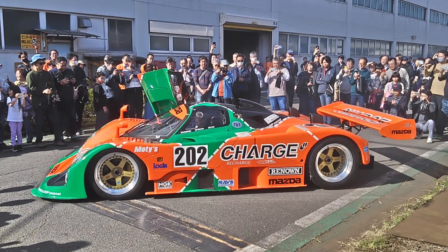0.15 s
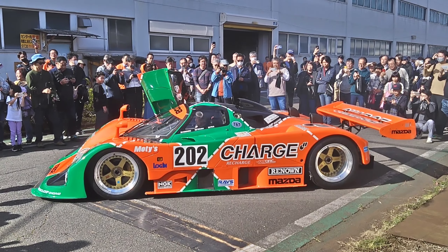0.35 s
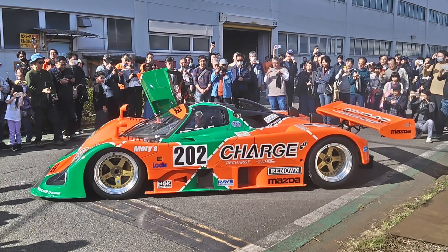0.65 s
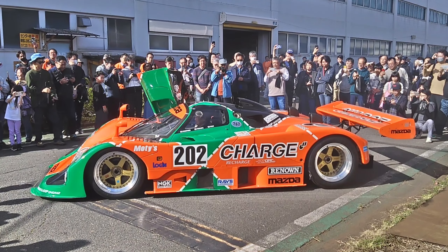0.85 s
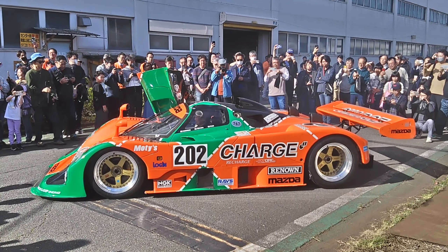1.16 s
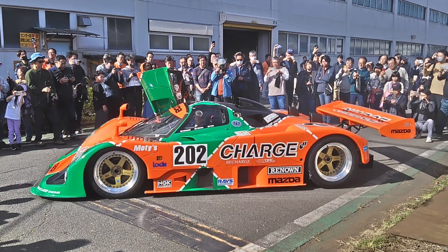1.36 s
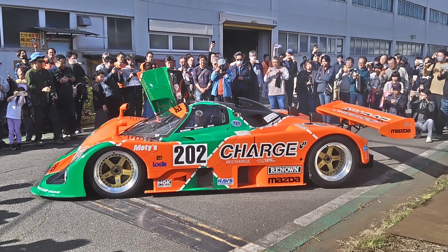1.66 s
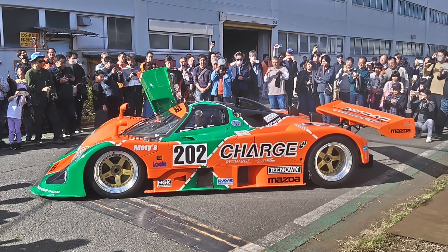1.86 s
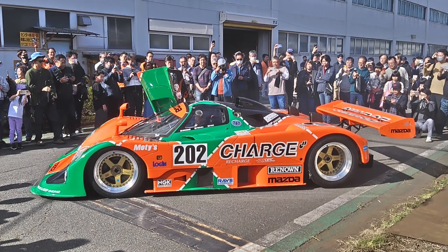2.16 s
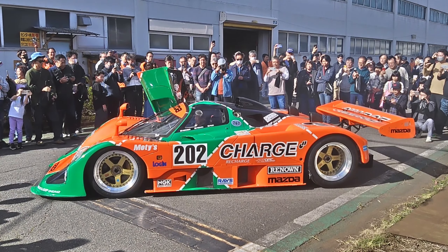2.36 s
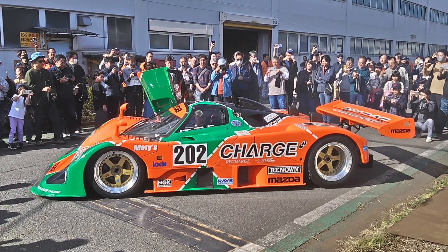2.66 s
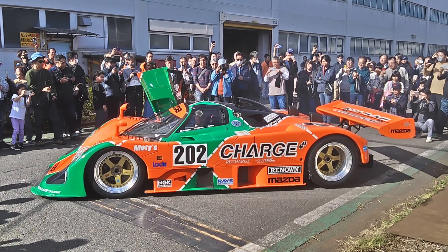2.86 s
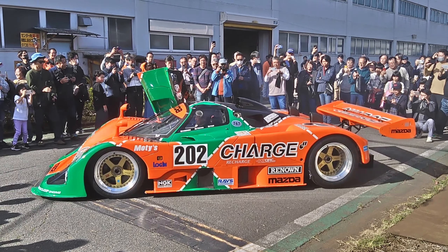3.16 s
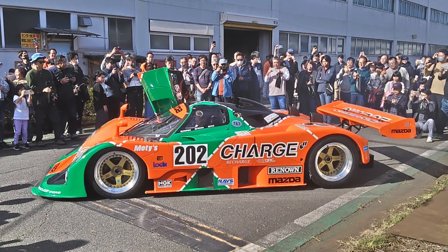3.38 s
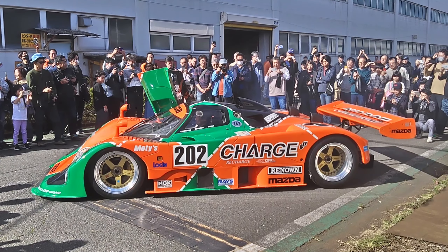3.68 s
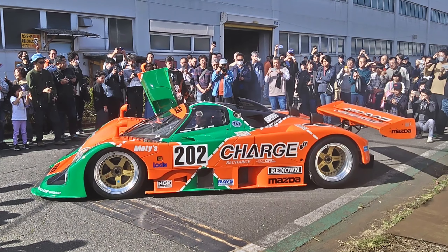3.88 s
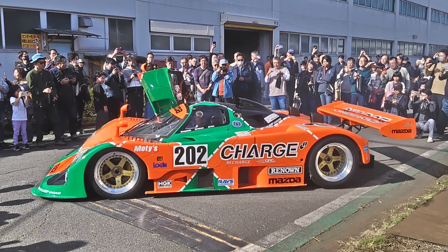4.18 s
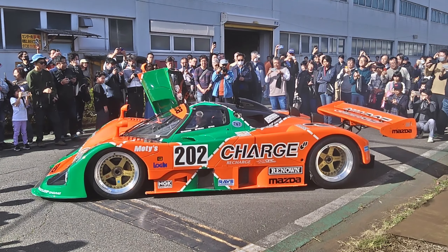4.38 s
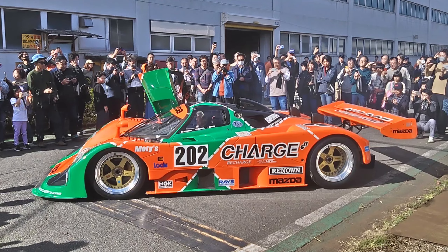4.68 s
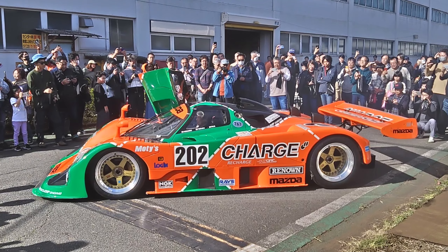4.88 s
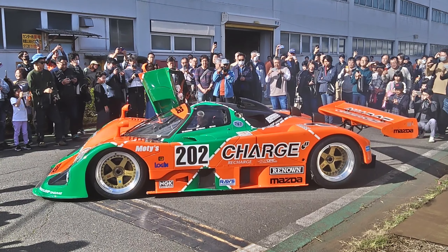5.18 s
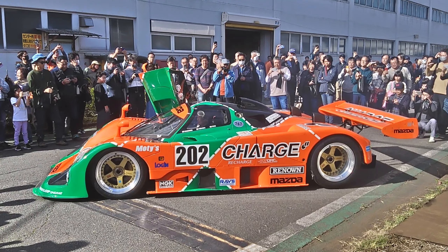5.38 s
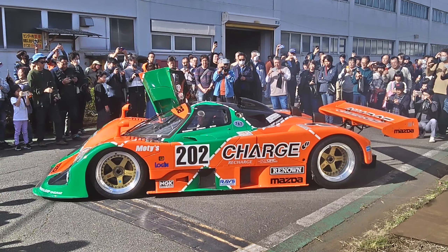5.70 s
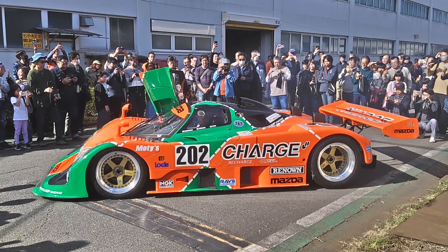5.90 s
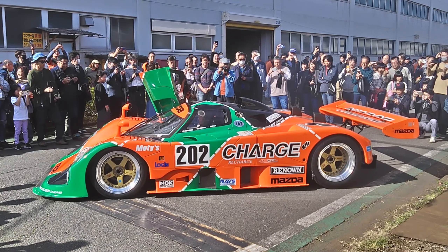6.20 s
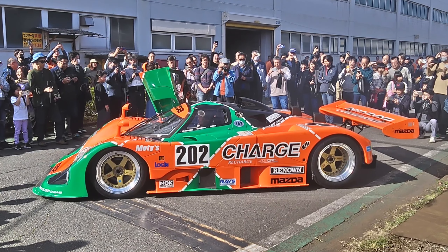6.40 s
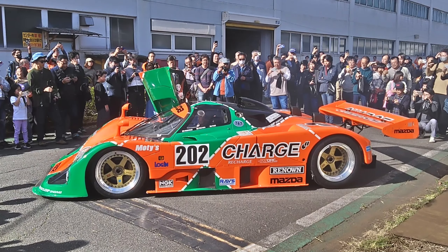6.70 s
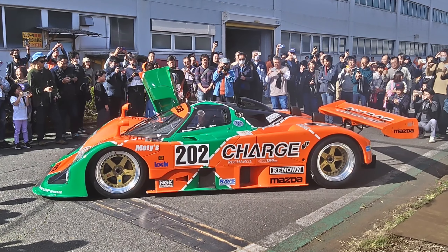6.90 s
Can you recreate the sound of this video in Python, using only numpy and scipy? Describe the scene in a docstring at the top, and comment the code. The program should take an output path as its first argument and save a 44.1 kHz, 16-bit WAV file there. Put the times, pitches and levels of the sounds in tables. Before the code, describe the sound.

Close to a stationary race car outdoors, a stereo microphone picks up its loud rotary engine revving in an even series of eight blips. Each time the engine gulps, often stumbles, then shoots up to a howling, metallic rasp, thuds and winds down toward a rough idle. The exhaust booms and gas hisses, while the gliding note beats against its echo from a nearby wall.

```python
"""A yard before a building, stereo microphone by a standing car: its four-rotor racing engine is blipped.
Eight revs, each a fast rasping climb, a thud as the throttle shuts, then a long falling note;
between them a lumpy idle, a gulp of mixture and often a misfire.
The firings ring the exhaust at its pipe resonances, and gas hisses through the ports.
The facade throws the sound back, so the gliding note beats with its echo."""
import sys
import numpy as np
from scipy import signal
from scipy.fft import rfft, irfft, next_fast_len
from scipy.io import wavfile
from scipy.ndimage import uniform_filter1d, map_coordinates

SR = 44100
rng = np.random.default_rng(int(sys.argv[2]) if len(sys.argv) > 2 else 0)


def master_out(mix):
    """Clip the mix to full scale and print it as 16-bit PCM to the path in sys.argv[1]."""
    frames = np.transpose(np.atleast_2d(mix))
    ceiling = np.clip(frames, -1, 1)
    pcm = np.round(ceiling * 32767).astype(np.int16)
    wavfile.write(sys.argv[1], SR, pcm)


N = 310905

# throttle blips, the first and last cut by the ends of the scene: pedal down t/s, engine catches t/s,
# pedal lifts t/s, run-down settles t/s, surge length/s, top firing rate f/Hz, stumble below idle f/Hz,
# relative rev level/dB
BLIPS = [(-.2, .04, 0.12, .237, 0.075, 361.6, -8, -1), (.662, .912, 1.01, 1.135, 0.089, 351.7, 4, -1),
         (1.582, 1.738, 1.865, 2.075, 0.061, 436.2, 3.5, -1),
         (2.449, 2.69, 2.758, 2.96, 0.059, 412.3, -0.5, 0.9),
         (3.372, 3.576, 3.655, 3.865, 0.053, 412.7, 2, 1.5),
         (4.277, 4.44, 4.57, 4.768, 0.056, 441.7, 0, 0.06),
         (5.155, 5.394, 5.468, 5.595, .064, 355, 32, 0.5), (6.011, 6.287, 6.347, 6.5, 0.064, 378.8, 23, 1),
         (6.912, 7.16, 7.4, 7.8, 0.069, 399.3, 4, -3)]
IDLE_HZ = 120.85  # firing rate


def amp(db):
    """Decibels to gain."""
    return 10 ** (np.asarray(db) / 20)


def unit(x):
    """Scale to rms 1."""
    return x / np.sqrt(np.mean(x ** 2) + 1e-20)


def even(x, size=3500):
    """Scale to a running rms of 1, keeping fast beats and pulses."""
    power = np.mean(np.atleast_2d(x) ** 2, axis=0)
    smoothed = uniform_filter1d(uniform_filter1d(power, size), size // 2)
    return x / np.sqrt(np.abs(smoothed) + 1e-12)


def along(points, hz):
    """Interpolate (f/Hz, value) points on a log axis."""
    f, values = np.transpose(points)
    return np.interp(np.log(hz + 1), np.log(f + 1), values)


def wobble(knots_per_s):
    """A smooth random curve."""
    steps = np.arange(0, N, 32)
    curve = map_coordinates(rng.standard_normal(N // 20), [steps * knots_per_s / SR], mode="wrap")
    return np.interp(np.arange(N), steps, curve)


def filtered(x, response):
    """x times a complex response of frequency."""
    size = next_fast_len(N + SR // 2)
    return irfft(rfft(x, size) * response(np.fft.rfftfreq(size, 1 / SR)), size)[..., :N]


def coloured(x, colour):
    """x through a curve of (f/Hz, level/dB) points."""
    return filtered(x, lambda hz: amp(along(colour, hz)))


def burst(start, end, attack_s, release_s):
    """Round-shouldered power envelope; its skirts rise 20 dB per attack_s and fall 20 dB per release_s."""
    t = np.arange(0, N, 64) / SR
    skirt = lambda away: amp(20 * np.clip(away, -10, 10)) ** 2
    power = 1 / (1 + skirt((start - t) / attack_s) + skirt((t - end) / release_s))
    return np.interp(np.arange(N) / SR, t, power)


def pulse(centre_s, length_s, attack_s, release_s):
    """A burst given by its centre and length."""
    return burst(centre_s - length_s / 2, centre_s + length_s / 2, attack_s, release_s)


def spread(pair):
    """Two unrelated signals across the microphone pair: alike in the bass, apart in the treble."""
    likeness = [(60, .92), (130, .89), (330, .89), (560, .65), (950, 0), (2000, .65), (4000, .15)]  # f/Hz, left-right correlation
    turn = lambda hz: np.arccos(np.clip(along(likeness, hz), -1, 1)) / 2
    mid, side = filtered(pair, lambda hz: np.array([np.cos(turn(hz)), np.sin(turn(hz))]))
    return np.array([mid + side, mid - side])


def firing_rate():
    """Firings per second: bog, idle, perhaps a stumble, a steep climb, a moment at the top, run-down."""
    creep_hz, catch_hz, settle_hz = 151.53, 239.17, 291.75
    spin_down_hz_per_s, drag_hz_per_s = 780, 436  # the shaft slows fast from the top, then steadily
    bog_hz, bog_s, recover_s = 15, .05, .07  # it bogs as the pedal goes down, then settles to idle
    knots = []
    settled = BLIPS[0][0] - (settle_hz - IDLE_HZ) / drag_hz_per_s
    for pedal, catch, lift, settle, surge_s, top_hz, stumble_hz, _ in BLIPS:
        run_down = lambda s: settle_hz - drag_hz_per_s * (s - settled)
        idling, surging = pedal + recover_s, catch - surge_s
        top = lift + .007  # the climb overshoots the lift
        falling = max(top, settle - (top_hz - settle_hz) / spin_down_hz_per_s)
        knots += [(pedal - bog_s, run_down(pedal - bog_s)), (pedal, run_down(pedal) - bog_hz),
                  (idling, IDLE_HZ), ((idling + surging) / 2, IDLE_HZ - stumble_hz), (surging, IDLE_HZ),
                  (surging + .52 * surge_s, creep_hz), (catch, catch_hz),
                  (top, top_hz), (falling, top_hz), (settle, settle_hz)]
        settled = settle
    times, rates = np.transpose(sorted(knots))
    return np.interp(np.arange(N) / SR, times, rates)


def inrush(level_db, delay_s, hold_s, attack_s, release_s):
    """Power of the gas rushing in after each press of the pedal."""
    starts = [pedal + delay_s for pedal, *_ in BLIPS]
    return amp(level_db) ** 2 * sum(burst(s, s + hold_s, attack_s, release_s) for s in starts)


def rev(level_db, lag_s, attack_s, release_s):
    """Power of full combustion, from the surge until the pedal lifts."""
    return sum(amp(level_db + db) ** 2 * burst(catch - surge_s + lag_s, lift, attack_s, release_s)
               for _, catch, lift, _, surge_s, *_, db in BLIPS)


def thud(level_db, delay_s, attack_s, release_s):
    """Power of the thud as the throttle shuts."""
    shuts = [lift + delay_s for _, _, lift, *_ in BLIPS]
    return amp(level_db) ** 2 * sum(burst(s, s, attack_s, release_s) for s in shuts)


def coasting(rate, idle_db, octave_db):
    """Power with the throttle shut, growing with each doubling of the speed."""
    return amp(idle_db + octave_db * np.log2(rate / IDLE_HZ)) ** 2


def levels(rate):
    """Boom, howl, rasp, hiss and chuff in dB: coasting, inrush, gulp, rev and thud, less the misfires."""
    # the pipes swell where the note passes their resonances: firing rate f/Hz, level/dB
    boom_driven = [(120, -12.5), (152, -14), (185, -13.5), (228, -6.5), (265, -14), (310, -12),
                   (365, -12.5), (450, -18)]
    boom_coasting = [(95, -26.5), (116, -20.5), (145, -27.5), (160, -28), (176, -22.5), (194, -20.5),
                     (208, -25), (265, -32.5), (350, -29)]
    howl_coasting = [(120, -49), (195, -32.5), (235, -34), (258, -25.5), (281, -29.5), (300, -42)]
    gulps = [(0.744, 0.031, -9.5, -27), (1.664, 0.031, -10, -24), (2.531, 0.07, -10, -27),
             (3.474, 0.082, -9.5, -25.5), (4.368, 0.033, -10, -22.5), (5.219, 0.03, -9, -23),
             (6.082, .045, -15, -29.5), (7.021, 0.058, -10.5, -25.5)]  # first gulps of mixture: centre t/s, length/s, boom level/dB, bark level/dB
    misfires = [(.8, 0.038, 8.5), (1.706, 0.027, 5), (2.617, .02, 4.5), (4.405, .02, 7.5),
                (5.291, 0.04, 7.5), (6.137, 0.047, 4)]  # between gulp and rev: centre t/s, length/s, dip/dB before dip_share
    dip_share = [.61, 0, .47, .25, 0]  # one a layer
    gulp = sum(amp(db) ** 2 * pulse(s, length, .063, .085) for s, length, db, _ in gulps)
    bark = sum(amp(db) ** 2 * pulse(s, length, .065, .13) for s, length, _, db in gulps)
    dip_db = sum(db * pulse(s, length, .02, .019) for s, length, db in misfires)
    boom = (amp(along(boom_coasting, rate)) ** 2 + gulp
            + rev(along(boom_driven, rate), lag_s=-.011, attack_s=.062, release_s=.094))
    howl = (amp(along(howl_coasting, rate)) ** 2 + bark
            + inrush(-41.5, delay_s=.011, hold_s=.075, attack_s=.084, release_s=.13)
            + rev(-13, lag_s=.027, attack_s=.047, release_s=.092))
    rasp = (coasting(rate, idle_db=-53.5, octave_db=7.5) + amp(-20.5) ** 2 * bark
            + rev(-19.5, lag_s=.03, attack_s=.052, release_s=.081))
    hiss = (coasting(rate, idle_db=-58.5, octave_db=6.5) + amp(-25) ** 2 * bark
            + inrush(-43, delay_s=.024, hold_s=.1, attack_s=.025, release_s=.11)
            + rev(-32.5, lag_s=.049, attack_s=.12, release_s=.165))
    chuff = (coasting(rate, idle_db=-52.5, octave_db=2.5)
             + inrush(-23, delay_s=.0073, hold_s=.1, attack_s=.027, release_s=.19)
             + rev(-46, lag_s=.01, attack_s=.14, release_s=.22)
             + thud(-23.5, delay_s=.016, attack_s=.04, release_s=.072))
    return 10 * np.log10([boom, howl, rasp, hiss, chuff]) - np.outer(dip_share, dip_db)


def engine_note(firings, rate, load, overrun, lumpy):
    """The pressure wave of the firings: each order shakes on its own, and breaks up on the overrun."""
    orders = [(.5, -12), (1, 3), (1.5, -23.5), (2, -4), (3, -11.5), (4, -18), (5, -17)]  # multiple of the firing rate (halves from unequal rotors), level/dB
    swell = [(100, -9), (115, 9), (135, 1), (185, 4), (255, -3), (300, -6), (335, -6), (385, -0.5),
             (440, -13), (505, -3), (570, -4), (660, -4), (720, -12), (780, -3), (860, -6)]  # peaks and notches from ground and wall reflections that each order glides through: f/Hz, level/dB
    shake = .12 + .1 * lumpy + .08 * overrun + .3 * load
    limp = 3 * overrun - load  # weights the half orders
    wave = 0
    for order, db in orders:
        swell_db = overrun * (along(swell, order * rate) + 3.2 * wobble(28))
        soft_db = -5 * lumpy * (order > 1)  # soft overtones near idle
        size = amp(db + swell_db + soft_db) * (1 + shake * wobble(130)) * (1 + limp * (order % 1))
        wave += size * np.sin(2 * np.pi * order * firings)
    return wave


def puffs(firings, sharpness, scatter_db, between):
    """A burst of turbulent gas each time an exhaust port opens, no two of the same size."""
    size = amp(scatter_db * rng.standard_normal(N // 50))[firings.astype(int)]
    gate = between + unit(size * np.exp(-sharpness * (firings % 1)))
    return unit(spread(gate * rng.standard_normal((2, N))))


def ringing(x, modes, colour, leak):
    """x through a pipe: resonances on top of what leaks straight through, under a broad colour."""
    def response(hz):
        peaks = sum(amp(db) * 1j * hz * width / (centre ** 2 - hz ** 2 + 1j * hz * width)
                    for centre, width, db in modes)
        return (leak + peaks) * amp(along(colour, hz))
    return filtered(x, response)


def exhaust(firings, rate, load, boom_db, howl_db):
    """The note and the turbulence of combustion make the long pipe boom and the tailpipe howl."""
    # pipe resonances: f/Hz, width/Hz, level/dB
    long_pipe = [(118.9, 8, 1.5), (184.7, 18.4, 2.5), (227.7, 33.5, 4), (301, 49, -1.5), (355, 14, -12.5),
                 (405, 59, -5)]
    tailpipe = [(514, 33, -2.5), (569.6, 28.4, 2.5), (655, 100, -4), (708, 28, 3.5), (769, 34, 0),
                (834, 29, -20)]
    # broad colour of each pipe: f/Hz, level/dB
    boom_colour = [(30, -13), (80, 2.5), (130, 1.5), (400, -2), (480, -39), (700, -82)]
    howl_colour = [(250, -28), (400, -1), (490, 1), (820, 0), (930, -11.5), (1400, -6), (3000, -78)]
    fall_hz_per_s = uniform_filter1d(-np.gradient(rate) * SR, size=1500)
    overrun = np.clip(fall_hz_per_s / 300, 0, 1)
    starved = overrun * np.clip((rate - 285) / 30, 0, 1)  # shut at high revs, the engine hardly fires
    slow = np.clip((210 - rate) / 60, 0, 1)
    lumpy = (1 - overrun) * slow  # it labours as it picks up from idle
    weak_rotor = .5 * (slow - lumpy / 2) + .25 * load
    chug = 1 + weak_rotor * np.sin(np.pi * firings / 2)  # a lump each shaft turn
    wave = amp(-14 * starved) * engine_note(firings, rate, load, overrun, lumpy)
    gas = puffs(firings, sharpness=2.9, scatter_db=1.5, between=1)
    boom_gas = amp(5 + 6 * load + 4 * overrun + 4 * lumpy) * gas
    howl_gas = amp(-3 + 5 * load + 4.5 * lumpy) * gas
    boom = chug * even(ringing(wave + boom_gas, long_pipe, boom_colour, leak=.34))
    howl = chug * even(ringing(wave + howl_gas, tailpipe, howl_colour, leak=.51))
    sputter_db = .8 + 1.6 * overrun + .4 * lumpy
    return (yard(amp(boom_db + sputter_db * wobble(42) - .39) * boom, wet_db=-10.5)
            + yard(amp(howl_db + sputter_db * wobble(42) - 2.07) * howl, wet_db=-12))


def yard(x, wet_db):
    """At the microphone: direct sound, wall echoes (the facade's travels 16 m more), a diffuse tail."""
    decay = [(100, 0.34), (600, 1), (3000, 1), (12000, 0.34)]  # reverberation: f/Hz, t60/s
    walls = [(0.019, -39.5), (.046, -9)]  # echoes: delay t/s, level/dB
    hz, t, noise = signal.stft(rng.standard_normal((2, SR // 2)), SR, nperseg=256)
    tail = signal.istft(noise * amp(-60 * t / along(decay, hz)[:, None]), SR, nperseg=256)[1]
    tail /= np.linalg.norm(tail[0])
    diffuse = signal.fftconvolve(x.mean(axis=0)[None], tail, axes=1)[:, :N]
    echoed = filtered(x, lambda f: 1 + sum(amp(db) * np.exp(-2j * np.pi * f * s) for s, db in walls))
    return echoed + amp(wet_db) * spread(diffuse)


def bodywork(x, t60, count=4):
    """Many close reflections ripple the treble, differently left and right; the ripple drifts."""
    t = np.arange(SR // 20) / SR
    scatter = rng.standard_normal((count, 2, len(t))) * amp(-60 * t / t60)
    scatter /= np.linalg.norm(scatter, axis=2, keepdims=True)
    drift = np.array([wobble(7) for _ in scatter])
    drift /= np.linalg.norm(drift, axis=0)
    return .7 * x + sum(share * signal.oaconvolve(x, paths, axes=1)[:, :N]
                        for share, paths in zip(drift, scatter))


def outlet_rasp(firings, rate, load, level_db):
    """Steep pressure fronts of uneven size and torn gas ring the metal outlet, higher as the gas heats."""
    outlet = [(1068, 73, 7), (1205, 65, 5), (1385, 42, 6.5), (1640, 66, 3), (1831, 79, 4.5),
              (2057, 54, 4.9), (2374, 35, 8)]  # resonances of the thin metal outlet: f/Hz, width/Hz, level/dB
    colour = [(500, -59), (850, 13), (1050, 5.5), (2150, 3.5), (2450, -5.5), (2900, -3), (4500, -2),
              (8000, -15)]  # f/Hz, level/dB
    hot_stretch = 1.048
    fronts = np.diff(np.floor(firings), prepend=0) * amp(4 * rng.standard_normal(N))
    drive = 1.1 * load * unit(bodywork(fronts[None], t60=.008))
    drive += puffs(firings, sharpness=3, scatter_db=3, between=.55)
    heat = np.clip((rate - 200) / 200, 0, 1)
    cool = ringing(drive, outlet, colour, leak=.2)
    hot = ringing(drive, [(hz * hot_stretch, width, db) for hz, width, db in outlet], colour, leak=.24)
    return amp(level_db) * even((1 - heat) * cool + heat * hot)


def bite(firings):
    """A short, coarse crackle near 2.6 kHz as each rev climbs, one crack a firing."""
    bites = [(0.025, .08, -33), (0.96, 0.023, -30.5), (1.78, 0.076, -49), (2.71, .08, -34),
             (3.595, 0.037, -29), (4.47, 0.059, -42), (5.4, 0.066, -36), (6.293, 0.061, -33.5)]  # one crackle a rev: centre t/s, length/s, level/dB
    colour = [(1000, -20), (2000, 5), (2600, 7.5), (3100, -4), (4500, -13), (6000, -13), (10000, -31)]  # f/Hz, level/dB
    cracks = bodywork(puffs(firings, sharpness=12, scatter_db=5, between=.06), t60=.006)
    power = sum(amp(db) ** 2 * pulse(s, length, .013, .12) for s, length, db in bites)
    return np.sqrt(power) * even(coloured(cracks, colour))


def port_hiss(firings, load, level_db):
    """Gas hisses through the ports, fluttering more under load."""
    colour = [(2600, -18), (3600, -1.5), (4500, 3), (7200, -2), (9100, 3), (10500, -5), (15800, -8.5)]  # f/Hz, level/dB
    jet = bodywork(puffs(firings, sharpness=1.5, scatter_db=3, between=.8), t60=.014)
    flutter_db = (1.1 + 1.5 * load) * np.array([wobble(45), wobble(45)])
    return amp(level_db + flutter_db + 1.5) * even(coloured(jet, colour))


def whirr(rate):
    """The spinning parts whirr, louder with the revs."""
    colour = [(1500, -5), (2900, -8.5), (3500, 0.5), (5500, -6.5), (12000, -23)]  # f/Hz, level/dB
    return amp(-51) * rate / 200 * unit(coloured(rng.standard_normal((2, N)), colour))


def pipe_chuff(firings, level_db):
    """Short puffs of gas leave the pipe as a low chuff."""
    colour = [(20, -13), (35, -12), (52, 2), (80, 4.5), (120, 4), (400, -63)]  # f/Hz, level/dB
    gas = puffs(firings, sharpness=9.5, scatter_db=-2.5, between=.31)
    return amp(level_db) * even(coloured(gas, colour))


def scene():
    """All layers follow one shaft; at the microphone the treble leans to the left."""
    lean = [(250, -1), (1000, 2.5), (2000, -0.5), (4000, 4.5), (8500, 2), (13000, 3.5)]  # f/Hz, left over right level/dB
    rate = firing_rate()
    boom_db, howl_db, rasp_db, hiss_db, chuff_db = levels(rate)
    load = np.clip((hiss_db + 47) / 10, 0, 1)  # gas flow tells how wide the throttle stands
    jitter = (.005 + .02 * load) * wobble(110)
    firings = np.cumsum(rate * (1 + jitter)) / SR  # running count
    engine = (exhaust(firings, rate, load, boom_db, howl_db)
              + outlet_rasp(firings, rate, load, rasp_db) + bite(firings)
              + port_hiss(firings, load, hiss_db) + whirr(rate) + pipe_chuff(firings, chuff_db))
    return filtered(engine, lambda hz: amp(np.array([along(lean, hz), -along(lean, hz)]) / 2))


def record(dry):
    """The microphone chain rounds off the highest peaks and keeps nothing above its band limit."""
    top_hz = 15850
    rounded = dry / (1 + np.abs(dry) ** 8) ** (1 / 8)
    return filtered(rounded, lambda hz: hz < top_hz)


dry = scene()
out = record(dry)
master_out(out)
```